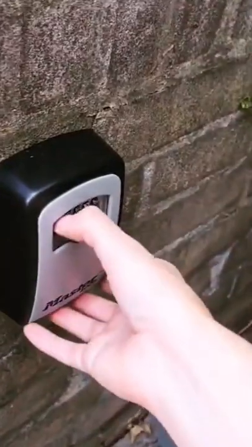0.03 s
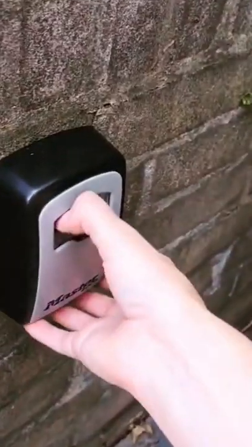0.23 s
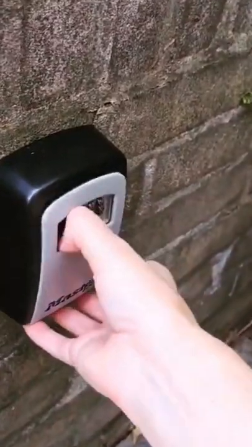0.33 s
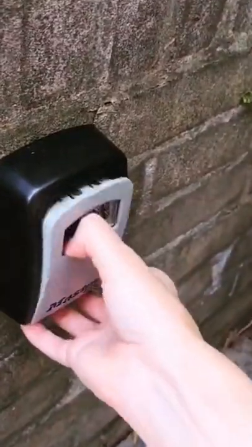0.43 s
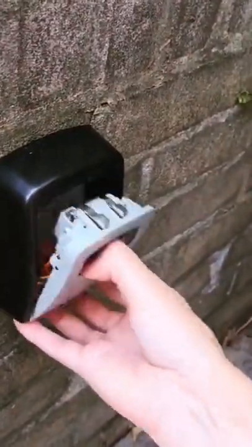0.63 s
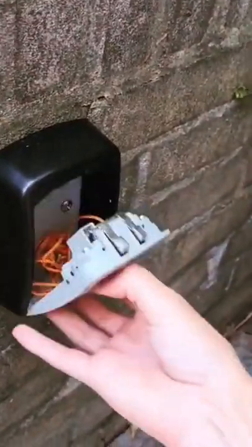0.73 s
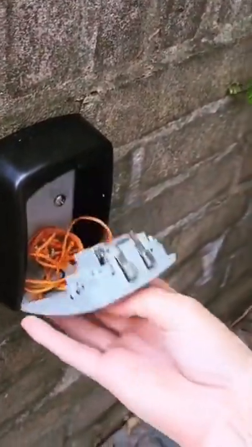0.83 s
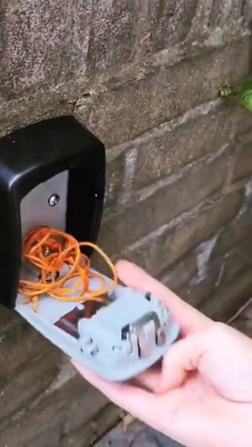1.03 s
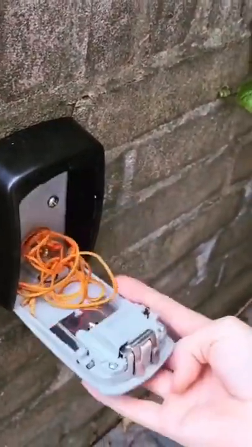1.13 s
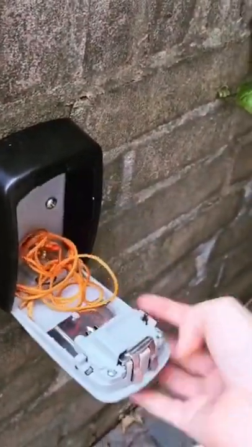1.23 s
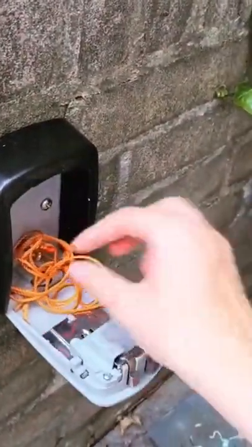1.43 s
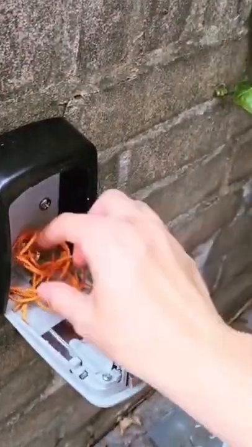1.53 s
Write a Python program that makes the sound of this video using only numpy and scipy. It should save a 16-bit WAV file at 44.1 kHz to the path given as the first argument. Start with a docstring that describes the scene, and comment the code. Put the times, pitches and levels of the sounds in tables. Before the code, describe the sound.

Close up outdoors, a metal lock box latch snaps free and its catch clicks back. The hinged cover knocks softly, squeaks a little and rattles against its stop, with faint finger rubbing and a low background rumble.

```python
"""A small metal lock box on a brick wall is opened, close up. Its latch snaps free, the catch springs back,
then the cover swings down with light knocks and hinge squeaks and rattles against its stop. Every hit layers a
crack, ringing metal and a damped thud of the case. Fingers rub faintly, and the yard answers briefly over a low
outdoor rumble and hum."""
import sys
import numpy as np
from scipy import signal
from scipy.fft import rfft, irfft, next_fast_len
from scipy.io import wavfile
from scipy.ndimage import map_coordinates

SR = 44100
rng = np.random.default_rng(int(sys.argv[2]) if len(sys.argv) > 2 else 0)


def persist_wave(psi):
    """Save psi, clipped to +-1, as 16-bit WAV."""
    counts = np.round(np.clip(psi, -1, 1) * 32767).astype(np.int16)
    wavfile.write(sys.argv[1], SR, np.atleast_2d(counts).T)


N = 70560

# outdoor rumble, fader and EQ: (t/s, level/dB), (f/Hz, gain/dB)
RUMBLE_LEVEL = [(0, -61.5), (.15, -62), (.3, -63), (.5, -67), (.66, -66), (.8, -66), (1, -64.5),
                (1.3, -66.5), (1.46, -65), (1.6, -67.5)]
RUMBLE_EQ = [(15, -22.5), (25, -11.5), (45, -2.5), (80, -12.5), (115, -6), (175, -22.5), (240, -15.5),
             (400, -28), (750, -30), (1400, -36.5), (3000, -43.5), (6000, -47.5), (10500, -51),
             (12000, -62)]
# fingers on the case, fader and EQ: (t/s, level/dB), (f/Hz, gain/dB)
RUB_LEVEL = [(0, -86.5), (.11, -75), (.16, -73), (.3, -64.5), (.45, -73), (.56, -82.5), (.74, -81),
             (.9, -72.5), (1.1, -81), (1.25, -82.5), (1.6, -92)]
RUB_EQ = [(100, -1.5), (140, 6), (230, 3), (400, -4), (700, -0.5), (1200, -5), (2000, -5), (4000, -17.5),
          (10000, -26.5)]
# stereo image of rumble and rub, and of the cracks: (f/Hz, left-right correlation)
BED_IMAGE = [(40, 1), (200, 0.37), (1000, 0.23), (4000, 0.3)]
CRACK_IMAGE = [(100, 0.99), (900, -0.5), (2000, 1), (3500, -0.15), (6000, 0.6), (8000, .2), (10500, 0.24)]
# squeaks of button and hinge, heard in the yard with the cover: (t/s, length/s, f/Hz, level/dB, rasp as a share
# of the pitch)
SQUEAK_CUES = [(0.052, 0.2, 3226, -73, .004), (0.78, 0.045, 3896, -56, 0.012),
               (.905, 0.11, 3795, -60.5, 0.029), (0.931, 0.042, 3870, -58.5, 0.02),
               (1.06, 0.017, 1663, -56, .01), (1.402, .13, 5947, -84, 0.026)]
# hits of each part: (t/s, level/dB, low-pass f/Hz, rise/s, crack t60/s, ring mix/dB, thud mix/dB)
LATCH_HITS = [(.2140, -39, 7300, 0.0017, 0.15, -3.5, -10.5), (.2187, -28, 2405, 0.006, 0.063, -2, -9.5),
              (.2216, -20.5, 2892, 0.00086, 0.043, 0, -10.5), (.2261, -13, 10800, 0.0011, 0.029, -1, -13),
              (.2285, -13, 10000, 0.00044, 0.031, -2.5, -14),
              (.2520, -36.5, 3360, 0.0029, 0.053, -5, -14.5)]
CATCH_HITS = [(.343, -62, 1060, 0.0066, 0.054, -5, -23), (.358, -38, 2000, 0.003, 0.052, -6, -5),
              (.3642, -33, 7834, 0.0006, 0.052, 1, 0), (.3676, -23.5, 11800, 0.00017, 0.021, -3.5, -12.5)]
COVER_HITS = [(.482, -47.5, 1890, 0.00079, 0.028, -20, -2.5), (.4965, -51, 1400, 0.00094, .025, -4.5, 1),
              (.7744, -45.5, 3418, .0012, 0.033, -1, -16), (.8005, -54.5, 4940, 0.0024, 0.063, -8, -13),
              (.816, -44.5, 1680, 0.002, 0.01, 5, 2), (.8243, -48, 1670, 0.0011, .025, -4, 5),
              (.831, -54.5, 3200, 0.00078, 0.091, 2.5, -5), (.9665, -46.5, 4540, 0.00046, 0.11, -10, -14),
              (.977, -36.5, 2330, 0.00017, 0.051, -13, 1), (.9832, -35.5, 4970, 0.0018, 0.081, -7, -37),
              (.9912, -37, 5840, 0.00067, 0.07, -20, -12), (1.002, -28, 8900, 0.0011, 0.043, -6.5, -19),
              (1.012, -41, 10030, 0.0013, .03, -15, -16), (1.0192, -28.5, 4700, 0.00098, 0.019, -3.5, -5),
              (1.024, -41, 6200, 0.0004, 0.081, -16, -2.5), (1.122, -67.5, 2980, .002, 0.15, -19, -27),
              (1.144, -55.5, 14000, .0012, 0.049, 0.5, -13)]
# ringing modes of each part: (f/Hz, relative level/dB, t60/s, left over right/dB)
LATCH_RING = [(833, -4, 0.031, -2.5), (977.5, -11.5, .06, 0), (1372, -8, .05, 5.5), (1723, -2.5, .05, -3),
              (2055, 3.5, .055, -1), (2403, -1, .06, -9), (2552, -1.5, 0.044, -4.5), (2795, -7, .06, -1.5),
              (2971, -7, .06, -3), (3260, -8, .05, -3.5), (3510, -6.5, 0.033, -4), (4365, -4, 0.046, 0.5),
              (4570, -8.5, .032, 6.5), (4845, -6, 0.044, 1.5), (6330, -7, .07, -2.5),
              (6640, -0.5, .07, 9.5), (7274, -3.5, 0.082, 7.5), (8100, 1, 0.05, 7), (9726, -6.5, .035, 2),
              (10260, -9.5, 0.064, -4)]
CATCH_RING = [(916, 1.5, 0.024, 6), (1033, -9, 0.073, -18), (1690, -5.5, 0.042, -19), (2198, 4, 0.038, -27),
              (3210, -4.5, 0.05, -21.5), (4620, 3.5, 0.038, -9), (6080, 1, 0.036, 2.5),
              (9140, -20, 0.025, 6)]
COVER_RING = [(399, -4.5, 0.055, 0.5), (843.5, 3.5, 0.071, 1), (967, -8, 0.051, 0),
              (1260, -8.5, 0.036, -24), (1548, 2, 0.049, 9), (1820, 2, 0.062, -5),
              (2192, 4.5, 0.036, -24.5), (3020, -6.5, .04, -34), (3400, 1.5, 0.062, -6),
              (3750, 3, 0.043, -18), (6350, 11, 0.043, 3.5)]
# tone of each part's crack: (f/Hz, gain/dB)
LATCH_EQ = [(50, -27), (170, -5), (380, -19.5), (800, -2), (2000, -2.5), (3200, 1.5), (4850, 4),
            (5250, -9.5), (6000, -3), (8500, 5.5), (9150, -14.5), (9750, 2), (11000, -13)]
CATCH_EQ = [(60, -15), (640, -16.5), (900, 2), (1450, -5), (2500, -0.5), (3300, -5), (4400, 1.5),
            (6500, -3), (8000, 2), (9900, -3.5), (11000, -21.5)]
COVER_EQ = [(60, -31), (200, -22.5), (380, -7.5), (560, -20.5), (900, -6), (1400, -5), (2200, -5),
            (2700, -7.5), (3700, -3.5), (4700, -10.5), (5900, -5.5), (8000, -6.5), (10400, -6),
            (11200, -45)]
# reverb of the yard, decay and EQ: (f/Hz, t60/s), (f/Hz, gain/dB)
YARD_DECAY = [(150, .15), (900, .2), (2200, 0.25), (5000, .175), (8000, .17), (11000, .175)]
YARD_EQ = [(100, -5), (900, 0.5), (2200, -4.5), (6000, -0.5), (11000, -4)]

HUM_HZ, HUM_DB, HUM_OCTAVE_DB = 110.6, -71, -8
RASP_RATE = 1100  # pitch turns a second
RING_RISE_S, MODE_SCATTER_DB = 0.00039, 1.93
RING_SPREAD_HZ = 2200  # a mode here strays up to about a radian per channel, higher ones more
THUD_HZ, THUD_PEAK_S = 930.5, 0.0012
YARD_PREDELAY_S = .008
TOP_HZ = 11100


def amp(db):
    """Decibels to gain."""
    return 10 ** (np.asarray(db) / 20)


def along(points, hz):
    """Read (f/Hz, value) points on a log axis."""
    f, v = np.transpose(points)
    return np.interp(np.log(hz + 1), np.log(f + 1), v)


def fader(points):
    """(t/s, value) points, one value per sample."""
    return np.interp(np.arange(N) / SR, *np.transpose(points))


def fade(t, t60):
    """Exponential decay, 60 dB down at t60."""
    return np.exp(-np.log(1000) * t / t60)


def wobble(rate):
    """A smooth random curve, rate knots a second."""
    return map_coordinates(rng.standard_normal(N // 10), [np.arange(N) * rate / SR], mode="wrap")


def filtered(x, response):
    """Zero-phase EQ; response gives the gain at each frequency."""
    n = x.shape[-1]
    m = next_fast_len(n + SR // 10)
    return irfft(rfft(x, m) * response(np.fft.rfftfreq(m, 1 / SR)), m)[..., :n]


def noise(colour, image, n):
    """Stereo noise of rms 1 with a given tone and stereo image."""
    def mid_side(hz):
        width = np.arccos(np.clip(along(image, hz), -1, 1)) / 2
        return colour(hz) * [np.cos(width), np.sin(width)]
    mid, side = filtered(rng.standard_normal((2, n)), mid_side)
    stereo = np.array([mid + side, mid - side])
    return stereo / np.sqrt(np.mean(stereo ** 2) + 1e-20)


def pan(db):
    """Channel gains that put left over right by db."""
    return amp(np.vstack([db, -db]) / 2)


def add(out, start, sound):
    """Mix a sound in at start seconds."""
    part = out[:, int(start * SR):][:, :sound.shape[-1]]
    part += sound[..., :part.shape[1]]


def outdoors():
    """The bed: a low rumble and a distant wavering hum."""
    rumble = amp(fader(RUMBLE_LEVEL)) * noise(lambda hz: amp(along(RUMBLE_EQ, hz)), BED_IMAGE, N)
    phase = 2 * np.pi * np.cumsum(HUM_HZ * (1 + .008 * wobble(36))) / SR
    hum = np.sin(phase) + amp(HUM_OCTAVE_DB) * np.sin(2 * phase)
    return rumble + amp(HUM_DB + 2.5 * wobble(27)) * hum


def fingers():
    """Skin rubs faintly and unevenly on the case."""
    level = amp(fader(RUB_LEVEL) + 1.5 * wobble(27))
    return level * noise(lambda hz: amp(along(RUB_EQ, hz)), BED_IMAGE, N)


def squeaks():
    """Sliding metal sings on one unsteady pitch that swells and dies."""
    out = np.zeros((2, N))
    for start, length, hz, db, rasp in SQUEAK_CUES:
        n = int(length * SR)
        pitch = hz * (1 + rasp * wobble(RASP_RATE)[:n])
        swell = amp(db + 1.8 * wobble(160)[:n]) * np.hanning(n)
        phase = 2 * np.pi * np.cumsum(pitch) / SR + rng.uniform(0, 5.6, (2, 1))
        add(out, start, swell * np.sqrt(2) * np.sin(phase))
    return out


def crack(colour, envelope):
    """The bite of a hit: a noise burst, flattened in spectrum and then coloured."""
    n = len(envelope)
    spectrum = rfft(noise(np.ones_like, CRACK_IMAGE, n) * envelope)
    flat = irfft(spectrum / (np.abs(spectrum) + 1e-12), n)
    flat *= envelope ** .25  # tightens the smeared tail
    colour_power = np.mean(colour(np.fft.rfftfreq(n, 1 / SR)) ** 2)
    makeup = np.sqrt(np.mean(envelope ** 2) / np.mean(flat ** 2) / colour_power)
    return makeup * filtered(flat, colour)


def ring(modes, lowpass, rise, t):
    """Struck metal rings in decaying modes, balanced a little differently on every hit."""
    hz, db, t60, pan_db = np.transpose(modes)
    gain = amp(db + MODE_SCATTER_DB * rng.standard_normal(len(hz))) * lowpass(hz)
    gain = gain / np.linalg.norm(gain) * pan(pan_db)
    phase = rng.uniform(0, 2 * np.pi, len(hz)) + rng.uniform(-1.1, 1, gain.shape) * hz / RING_SPREAD_HZ
    tones = gain[..., None] * np.sin(2 * np.pi * hz[:, None] * t + phase[..., None])
    attack = 1 - np.exp(-t / (rise + RING_RISE_S))
    return attack * (tones * fade(t, t60[:, None])).sum(1)


def hits(cues, modes, crack_eq):
    """Each contact layers crack, ring and the damped case's thud; soft contacts lose their treble."""
    out, t = np.zeros((2, N)), np.arange(SR // 4) / SR
    thud_swell = t / THUD_PEAK_S * np.exp(1 - t / THUD_PEAK_S)
    thud = thud_swell * np.sqrt(2) * np.sin(2 * np.pi * THUD_HZ * t)
    for start, db, cutoff_hz, rise, t60, ring_db, thud_db in cues:
        lowpass = lambda hz: 1 / np.sqrt(1 + (hz / cutoff_hz) ** 7)
        envelope = fade(t, t60) * (1 - np.exp(-t / rise))
        bite = crack(lambda hz: amp(along(crack_eq, hz)) * lowpass(hz), envelope)
        metal = ring(modes, lowpass, rise, t)
        add(out, start, amp(db) * (bite + amp(ring_db) * metal + amp(thud_db) * thud))
    return out


def latch():
    """The latch lets go in a tight cluster of bright snaps."""
    return hits(LATCH_HITS, LATCH_RING, LATCH_EQ) * pan(db=0.1)


def catch():
    """The catch springs back in clicks that grow louder and brighter."""
    return hits(CATCH_HITS, CATCH_RING, CATCH_EQ) * pan(db=3.1)


def cover():
    """The loose cover knocks in its hinge and rattles on its stop."""
    return hits(COVER_HITS, COVER_RING, COVER_EQ) * pan(db=-1.0)


def yard(x, send_db):
    """The direct sound plus the short answer of the brick walls."""
    hz, t, bands = signal.stft(rng.standard_normal((2, SR // 2)), SR, nperseg=256)
    tail = signal.istft(bands * fade(t, along(YARD_DECAY, hz)[:, None]), SR, nperseg=256)[1]
    tail = filtered(tail / np.linalg.norm(tail[0]), lambda f: amp(along(YARD_EQ, f)))
    tail = np.pad(tail, ((0, 0), (int(YARD_PREDELAY_S * SR), 0)))
    return x + amp(send_db) * signal.fftconvolve(x, tail, axes=1)[:, :N]


def scene():
    """The metal feeds the yard reverb; fingers and bed stay dry."""
    snap, clicks, knocks = latch(), catch(), cover()
    box = yard(snap, send_db=-16) + yard(clicks, send_db=-18.5) + yard(knocks + squeaks(), send_db=-16.5)
    return box + fingers() + outdoors()


def record(dry):
    """A steep high cut on the whole mix."""
    return filtered(dry, lambda hz: 1 / np.sqrt(1 + (hz / TOP_HZ) ** 90))


dry = scene()
out = record(dry)
persist_wave(out)
```